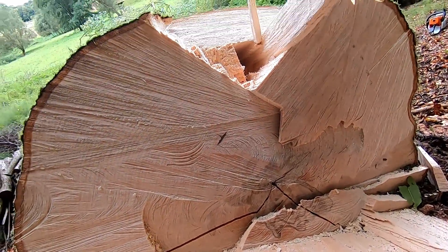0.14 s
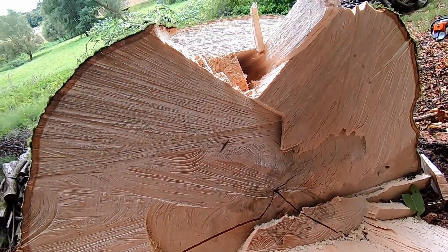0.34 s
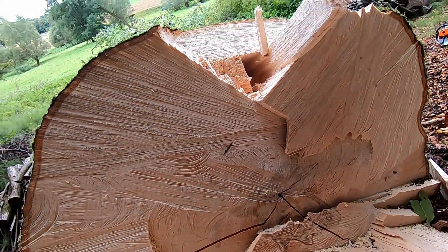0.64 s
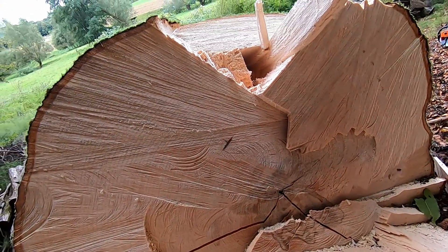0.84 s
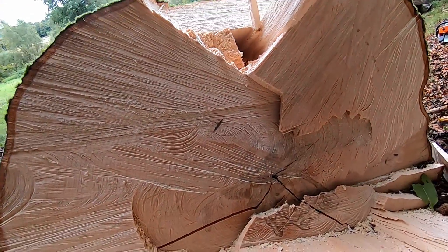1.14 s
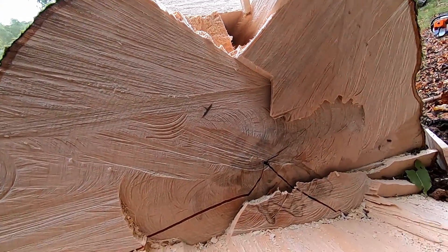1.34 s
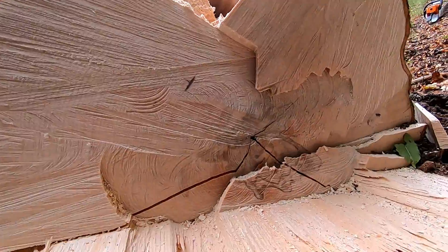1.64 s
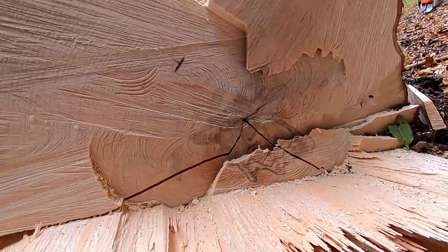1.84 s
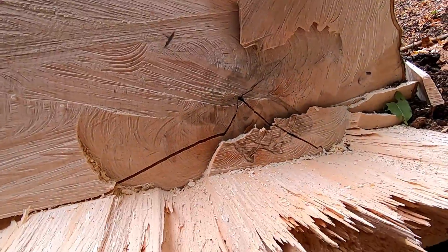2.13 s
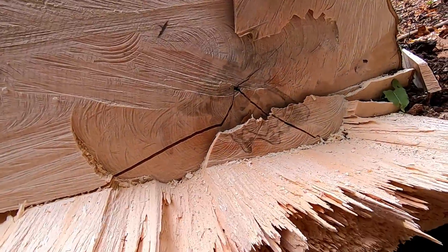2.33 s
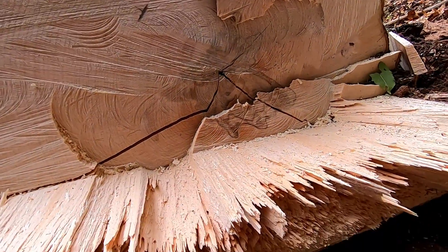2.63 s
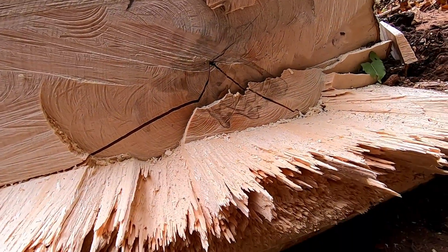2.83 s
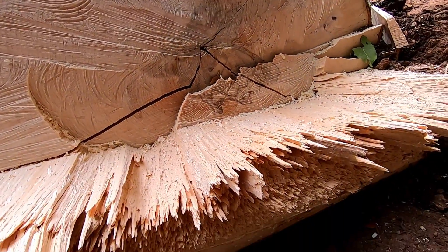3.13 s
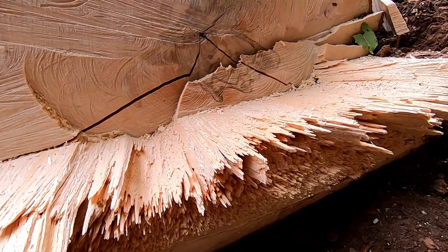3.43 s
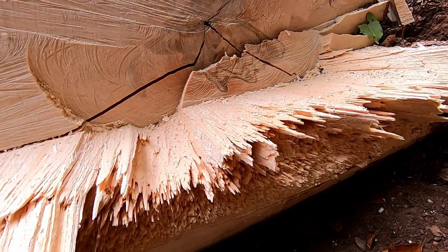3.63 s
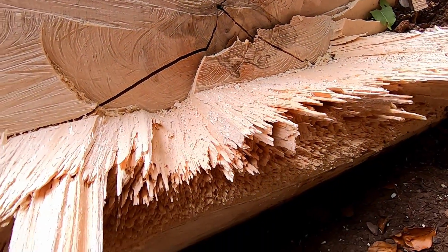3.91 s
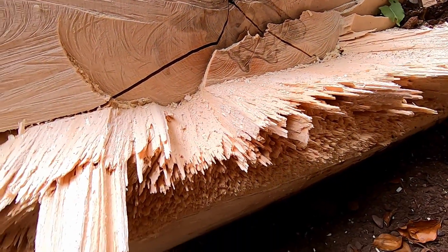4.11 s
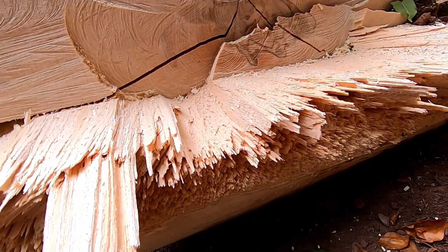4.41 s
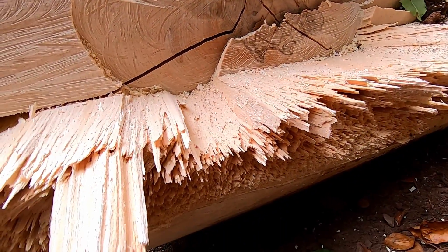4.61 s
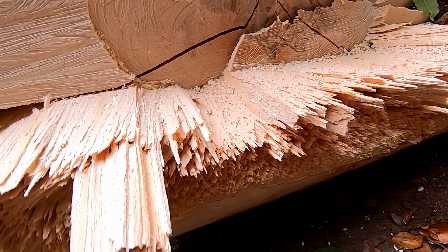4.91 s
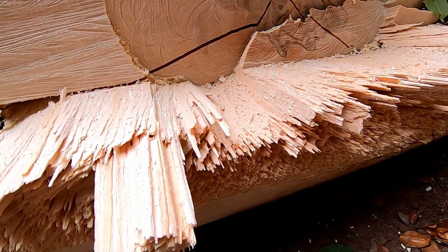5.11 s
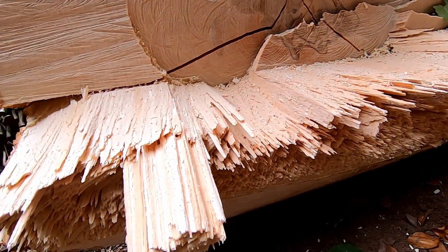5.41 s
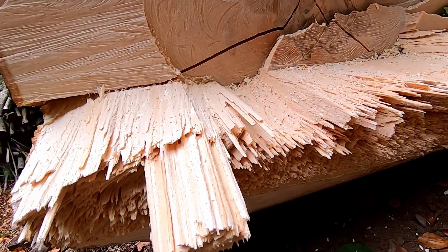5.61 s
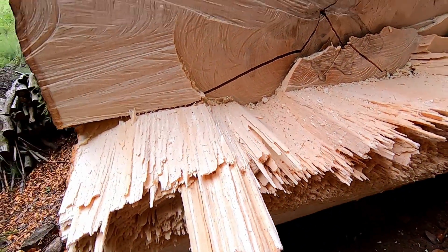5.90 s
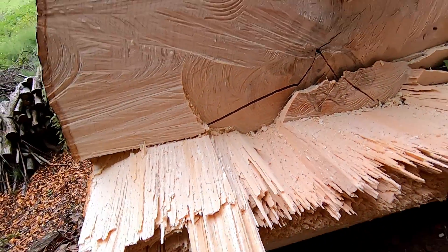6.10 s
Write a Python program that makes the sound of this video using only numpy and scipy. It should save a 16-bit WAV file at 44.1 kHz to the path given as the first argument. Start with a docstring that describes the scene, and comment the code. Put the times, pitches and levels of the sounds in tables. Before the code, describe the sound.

Outdoors near woodland, five heavy blows land slowly on a felled trunk. Each is a deep, dull thump through wood and soil, followed almost at once by a fainter dry crack with scattered echoes from trees. Between them come tiny twig ticks, soft rustles and a light hollow knock just before the third blow. A quiet hush and faint low wind on the close microphone continue throughout.

```python
"""Outdoors, at the sawn end of a felled tree: five slow, heavy blows over a quiet hush and wind on the microphone.
Each arrives twice: a dull thump through trunk and soft ground (decaying sine modes, filtered noise bursts),
then a faint crack through the air (noise and a ping, coloured by wood resonances), scattered by the trees.
Twig ticks and soft rustles are shaped noise; light hollow knocks are decaying modes with a rub of noise."""
import sys
import numpy as np
from scipy import signal
from scipy.fft import rfft, irfft
from scipy.io import wavfile
from scipy.ndimage import uniform_filter1d

SR = 44100
rng = np.random.default_rng(int(sys.argv[2]) if len(sys.argv) > 2 else 0)


def inscribe(sig):
    """Save sig as 16-bit PCM at rate SR to the path in sys.argv[1].

    A 1-D sig is mono; a 2-D sig holds one channel per row.
    Samples are clipped to [-1, 1] before scaling.
    """
    pcm = np.round(np.clip(np.atleast_2d(sig).T, -1, 1) * 32767)
    wavfile.write(sys.argv[1], SR, pcm.astype(np.int16))


N = 275660
T = np.arange(int(1.2 * SR)) / SR  # time axis of one event, s

HARD_HZ, HARD_OCTAVES = 496, 0.48  # a hard blow lifts the wood's middle range
NODE_OCTAVES = 0.22  # modes with a node near the struck spot stay weak
NODE_RATIO, NODE_SHARE = 2.13, 0.3  # a higher mode shares the node and is weakened less
TREBLE_HZ = 1740  # above this a clean hit is brighter than a glancing one
RING_DB, RING_OCTAVES = 4.5, 0.24  # each crack favours one pitch of the struck spot
AIR_LAG_S = 0.059  # the crack through the air trails the thump through the trunk
TOP_HZ = 10500


def undb(db):
    """Decibels to gain."""
    return 10 ** (np.asarray(db) / 20)


def curve(hz, points):
    """(Hz, value) points joined by straight lines over log frequency."""
    points_hz, values = np.transpose(points)
    return np.interp(np.log(np.maximum(hz, 1)), np.log(points_hz), values)


def colour(x, points):
    """Zero-phase filter by a smooth (Hz, dB) spectrum."""
    size = x.shape[-1]
    hz = np.fft.rfftfreq(size, 1 / SR)
    return irfft(rfft(x) * undb(curve(hz, points)), size)


def causal(x, points):
    """Minimum-phase filter by a smooth (Hz, dB) spectrum: no sound ahead of the hit."""
    size = 2 * x.shape[-1]
    hz = np.fft.rfftfreq(size, 1 / SR)
    cepstrum = irfft(np.log(undb(curve(hz, points))))
    # fold the cepstrum onto positive time
    cepstrum[1:size // 2] *= 2
    cepstrum[size // 2 + 1:] = 0
    response = np.exp(rfft(cepstrum))
    return irfft(rfft(x, size) * response)[..., :size // 2]


def unit(x):
    """Scale to rms 1."""
    return x / np.sqrt(np.mean(x ** 2))


def bump(hz, centre_hz, octaves):
    """A bell on the log-frequency axis, 1 at its centre."""
    return np.exp(-.5 * (np.log2(hz / centre_hz) / octaves) ** 2)


def fade(t60_s, rise_s, delay_s=0):
    """An envelope that starts after a delay, swells and dies away."""
    t = np.maximum(T - delay_s, 0)
    swell = 1 - np.exp(-(t / rise_s) ** 2)
    return swell * np.exp(-np.log(1000) * t / t60_s)


def walk(rate_hz, size):
    """Smoothed random steps, rms 1."""
    k = int(SR / rate_hz)
    steps = np.repeat(rng.standard_normal(size // k + 1), k)
    smooth = uniform_filter1d(uniform_filter1d(steps, k), k)
    return unit(smooth[:size])


def pan(db):
    """Gains for a left-minus-right level."""
    return undb(np.array([[db], [-db]]) / 2)


def add(out, start_s, x):
    """Mix a sound in at its start time."""
    i = max(int(start_s * SR), 0)
    out[:, i:i + x.shape[-1]] += x[..., :N - i]


# likeness of left and right in airborne sound: [f/Hz, correlation]
LIKENESS = [(60, 0.89), (300, 0.86), (600, 0.63), (1100, 0.16), (1900, 0.38), (3300, 0.8), (6000, 0.44),
            (10000, 0.016)]


def stereo_noise(size):
    """White noise, its left-right correlation set per frequency by the mid/side balance."""
    hz = np.fft.rfftfreq(size, 1 / SR)
    alike = np.clip(curve(hz, LIKENESS), -1, 1)
    mid, side = rfft(rng.standard_normal((2, size))) * np.sqrt([1 + alike, 1 - alike])
    return unit(irfft([mid + side, mid - side], size))


def air_noise(points, size):
    """Stereo noise of rms 1 with the given spectrum."""
    return unit(colour(stereo_noise(size), points))


# shape of the hush spectrum: [f/Hz, relative level/dB per Hz]
HUSH_SPECTRUM = [(71, -46), (120, -23), (151, 2.5), (172, -39), (200, 7), (232, -14), (270, -3.5),
                 (534, -2), (621, -1), (889, -4.5), (1010, -3), (1400, -3.5), (2120, -10), (7520, -18.5),
                 (11000, -36), (14300, -79), (22000, -120)]
# shape of the wind spectrum: [f/Hz, relative level/dB per Hz]
WIND_SPECTRUM = [(15, -20), (28, 1), (45, 2), (75, 3.5), (120, -14.5), (200, -4.5), (400, -39.5)]
# slow swell of the distant part of the hush: [t/s, relative level/dB]
DISTANT_SWELL = [(0, 1.5), (1.2, 1.5), (2.4, 0), (3.3, -2), (3.9, 3.5), (4.6, -3.5), (5.3, -5.5),
                 (6.25, -6.5)]


def outdoors(wind_db=-55.0, leaves_db=0, hush_db=-54, gust_db=3, waver_db=1):
    """A broad hush whose distant, dull part swells and sinks, and small gusts on the microphone."""
    swell_db = np.interp(np.arange(N) / SR, *np.transpose(DISTANT_SWELL))
    hush = undb(hush_db) * air_noise(HUSH_SPECTRUM, N)
    dull = colour(hush, [(1200, 0.0), (2600, -32)])
    distant = dull * undb(swell_db + waver_db * walk(7.73, N))
    leaves = (hush - dull) * undb(leaves_db)
    gusts = air_noise(WIND_SPECTRUM, N) * undb(wind_db + gust_db * walk(12, N))
    return distant + leaves + gusts


def contact_db(hz, hard_db, node_hz, node_db):
    """How hard and where the blow lands decides how strongly each pitch answers."""
    nodes = bump(hz, node_hz, NODE_OCTAVES)
    nodes = nodes + NODE_SHARE * bump(hz, NODE_RATIO * node_hz, NODE_OCTAVES)
    return hard_db * bump(hz, HARD_HZ, HARD_OCTAVES) - node_db * nodes


# modes of the trunk on its bed of soil: [f/Hz, relative level/dB, t60/s]
TRUNK_MODES = [(39.25, -4, 0.58), (80.2, 11, 0.28), (135.8, 17.5, 0.11), (177, 10.5, 0.21),
               (245.3, 2.5, 0.43), (304.8, 8.5, 0.15), (382.8, 10.5, 0.33), (517, 17.5, 0.053),
               (543, 11.5, 0.16), (591, 7, 0.19), (663, 6.5, 0.26), (757, 3, 0.15), (833, -0.5, 0.3),
               (945, 2, 0.21), (1032, -3.5, 0.46)]
# how strongly a blow drives those modes: [f/Hz, relative level/dB]
PUSH = [(74, -25.5), (124, -21.5), (182, -25.5), (262, -27.5), (380, -36), (570, -37), (930, -46)]
# short waves scattered inside the trunk: [f/Hz, relative level/dB]
SCATTER = [(60, -18.5), (125, 6.5), (195, -1.5), (262, -3.5), (380, -13.5), (570, -15), (900, -24),
           (1200, -33), (1600, -46.5), (2600, -81.5)]
# shape of the rumble that lingers in the soil: [f/Hz, relative level/dB per Hz]
SOIL_SPECTRUM = [(20, -24.5), (40, -15.5), (85, -1), (170, -2.5), (240, -22.5), (500, -21), (1200, -58.5)]


def thump(hard_db, node_hz, node_db, far_db,
          push_s=0.013, burst_s=0.028, ring_db=-8, soil_db=-28, soil_share=0.31):
    """A push sets the trunk ringing; short waves scatter off knots and limbs, long ones through the soil."""
    noise = rng.standard_normal(len(T))
    burst = 1 / (1 + (T / burst_s) ** 8)
    burst = burst + undb(ring_db) * (1 - burst)
    wood = 0
    for k, (hz, db, t60_s) in enumerate(TRUNK_MODES):
        mode_db = db + curve(hz, PUSH) + contact_db(hz, hard_db, node_hz, node_db)
        # neighbouring modes swing in opposite senses
        gain = (-1) ** k * undb(mode_db)
        mode = gain * np.sin(2 * np.pi * hz * T) * fade(t60_s, push_s)
        # short waves pass as a burst and leave only a weaker ring
        wood = wood + mode * (burst if hz > 210 else 1)

    hz = np.geomspace(50, SR / 2, num=400)
    scatter_db = curve(hz, SCATTER) + contact_db(hz, hard_db, node_hz, node_db)
    scatter = noise * burst * fade(t60_s=0.31, rise_s=0.0029, delay_s=0.0027)
    scatter = causal(scatter, np.transpose([hz, scatter_db]))

    soil = air_noise(SOIL_SPECTRUM, len(T)) * fade(t60_s=0.44, rise_s=0.0038, delay_s=0.036)
    # a harder blow shakes the soil more
    soil = undb(soil_db + soil_share * hard_db) * soil

    # the boom comes back from a distant slope
    far = air_noise([(50, -3), (100, 30.5), (160, 21.5), (300, -9), (700, -40)], len(T))
    far = undb(far_db) * far * fade(t60_s=0.69, rise_s=0.008, delay_s=0.453)
    return wood + scatter + soil + far


# colour of the crack: [f/Hz, relative level/dB]
CRACK_COLOUR = [(570, -26.5), (1100, -27), (1900, -34.5), (3100, -37.5), (5300, -41.5), (8600, -53.5)]
# resonances of the struck wood, heard through the air: [f/Hz, width/Hz, relative level/dB]
WOOD_PEAKS = [(369, 56, 12), (504, 38, 1), (968, 270, 8), (1282, 36, 10), (1930, 150, 3.5),
              (2780, 1000, 4.5), (3240, 240, 4)]
# colour of the echoes, brighter than the direct crack: [f/Hz, relative level/dB]
WOODS_COLOUR = [(150, -38), (500, -12), (1000, -6), (1900, -1.5), (3000, 0), (5000, 7), (9000, 8.5)]


def crack(hard_db, treble_db, ring_hz, pan_db, snap_db=9.0, ping_db=-11, bounce_db=-1.5,
          woods_db=2.5, late_db=-11.0, grain_db=1.5, echo_grain_db=1.5):
    """Through the air: a crack with a ping of wood, a reflection close by, then echoes from the trees."""
    snap = undb(snap_db) * fade(t60_s=.06, rise_s=.0012)
    bounce = undb(bounce_db) * fade(t60_s=0.13, rise_s=0.0042, delay_s=0.0092)
    ping = undb(ping_db) * np.sin(2 * np.pi * ring_hz * T) * fade(t60_s=0.072, rise_s=0.003)
    direct = pan(pan_db) * (stereo_noise(len(T)) * (snap + bounce) + ping)

    trees = colour(stereo_noise(len(T)), WOODS_COLOUR) * undb(woods_db)
    trees = trees * fade(t60_s=0.46, rise_s=0.028, delay_s=0.019)
    # echoes from further off have lost their treble
    late_colour = [(150, 7), (400, -7.0), (1000, 1.0), (3000, 4.5), (5000, 0), (10000, -22)]
    late = colour(stereo_noise(len(T)), late_colour) * undb(late_db)
    late = late * fade(t60_s=1.39, rise_s=0.032, delay_s=0.035)

    # single stems answer one by one, so the echo is grainy
    grain = walk(600, len(T))
    sound = direct * undb(grain_db * grain) + (trees + late) * undb(echo_grain_db * grain)

    hz = np.geomspace(50, SR / 2, num=400)
    peaks_db = sum(db / (1 + (2 * (hz - centre_hz) / width_hz) ** 2)
                   for centre_hz, width_hz, db in WOOD_PEAKS)
    peaks_db = peaks_db - np.mean(peaks_db)
    blow_db = hard_db * bump(hz, HARD_HZ, HARD_OCTAVES)
    blow_db = blow_db + treble_db / (1 + (TREBLE_HZ / hz) ** 6)
    blow_db = blow_db + RING_DB * bump(hz, ring_hz, RING_OCTAVES)
    return causal(sound, np.transpose([hz, curve(hz, CRACK_COLOUR) + blow_db + peaks_db]))


def tick(hz):
    """A twig snaps: a few milliseconds of noise around one frequency."""
    snap = fade(t60_s=.006, rise_s=.0002)
    return air_noise([(hz / 4, -25), (hz, 0), (hz * 3, -26)], len(T)) * snap


def rustle(hz, t60_s):
    """A soft, dull swish in the litter: band-shaped noise that swells and fades."""
    swish = air_noise([(hz / 3, -20), (hz, 0), (hz * 3, -22)], len(T))
    return swish * fade(t60_s, rise_s=t60_s / 10)


# modes of a light hollow knock: [f/Hz, relative level/dB, t60/s]
HOLLOW_MODES = [(61.6, -16, 0.24), (356.6, 7.5, 0.085), (378.5, 2, 0.25), (539, -16, 0.37), (820, -32, .12),
                (850, -15.5, 0.21), (1350, -21, 0.24), (1410, -47, 0.19), (1500, -19, 0.14),
                (1580, -39, .12), (2200, -29, 0.067)]


def knock(rub_db=-1):
    """A soft contact rings something hollow and rubs on it briefly."""
    ring = sum(undb(db) * np.sin(2 * np.pi * hz * T) * fade(t60_s, rise_s=0.015)
               for hz, db, t60_s in HOLLOW_MODES)
    rub = air_noise([(200, -2.5), (450, -8.5), (1500, -15.5), (2500, -27.5), (5000, -53)], len(T))
    rub = rub * fade(t60_s=0.21, rise_s=0.03)
    return ring + undb(rub_db) * rub


# blows: [t/s, thump level/dB, hardness/dB, node f/Hz, node depth/dB, far echo level/dB,
#         crack level/dB, crack treble/dB, crack ring f/Hz, crack left-minus-right/dB]
BLOWS = [(0.027, -1.5, 2, 260, 11.5, -64, -3, -10, 1180, 2.5),
         (1.465, 0.5, -1.5, 250, 11.5, -43.5, 0.5, -1, 2760, 1),
         (2.914, 2, 9.5, 205, 1.5, -49.5, -1, -1.5, 2030, 0.5),
         (4.225, 0.5, -0.5, 189, 20.5, -49.5, -1, 1, 1904, 3),
         (5.300, 0, -6, 127, 19, -58, -0.5, 0, 3400, 3)]
# twig ticks: [t/s, level/dB, centre f/Hz]
TICKS = [(0.639, -47, 9500), (1.455, -37.5, 2800)]
# soft rustles: [t/s, level/dB, centre f/Hz, t60/s]
RUSTLES = [(0.66, -55, 330, 0.35), (3.719, -67, 620, 1.0), (3.945, -41, 1730, 0.077),
           (4.914, -46, 580, 0.087)]
# light hollow knocks: [t/s, level/dB]
KNOCKS = [(0.722, -47), (2.838, -23)]


def scene():
    """Blows and small noises over the outdoor background."""
    out = outdoors()
    for t_s, thump_db, hard_db, node_hz, node_db, far_db, crack_db, treble_db, ring_hz, pan_db in BLOWS:
        add(out, t_s, undb(thump_db) * thump(hard_db, node_hz, node_db, far_db))
        add(out, t_s + AIR_LAG_S, undb(crack_db) * crack(hard_db, treble_db, ring_hz, pan_db))
    for t_s, db, hz in TICKS:
        add(out, t_s, undb(db) * tick(hz))
    for t_s, db, hz, t60_s in RUSTLES:
        add(out, t_s, undb(db) * rustle(hz, t60_s))
    for t_s, db in KNOCKS:
        add(out, t_s, undb(db) * knock())
    return out


def record(dry):
    """A steep elliptic low-pass cuts the top: 0.2 dB ripple, 60 dB stopband."""
    low_pass = signal.ellip(8, .2, 60, TOP_HZ, fs=SR, output="sos")
    return signal.sosfilt(low_pass, dry)


dry = scene()
out = record(dry)
inscribe(out)
```